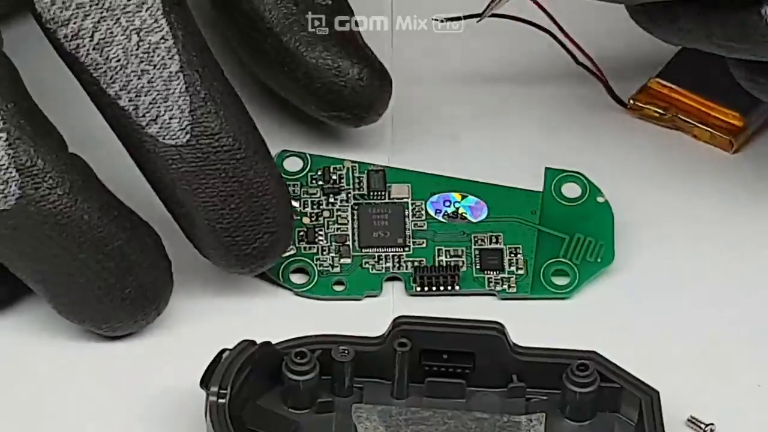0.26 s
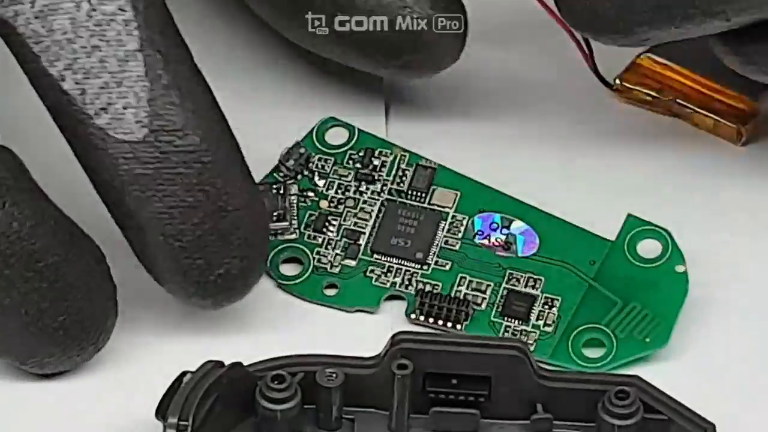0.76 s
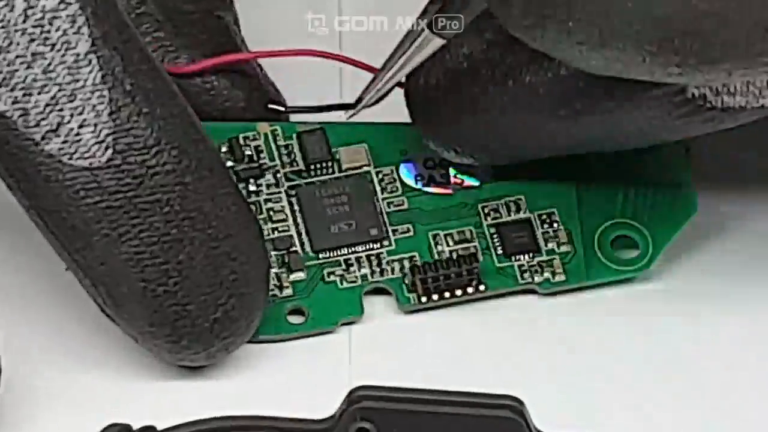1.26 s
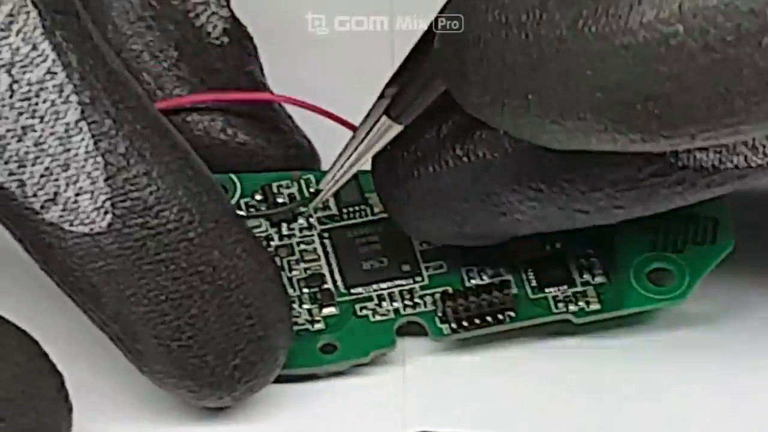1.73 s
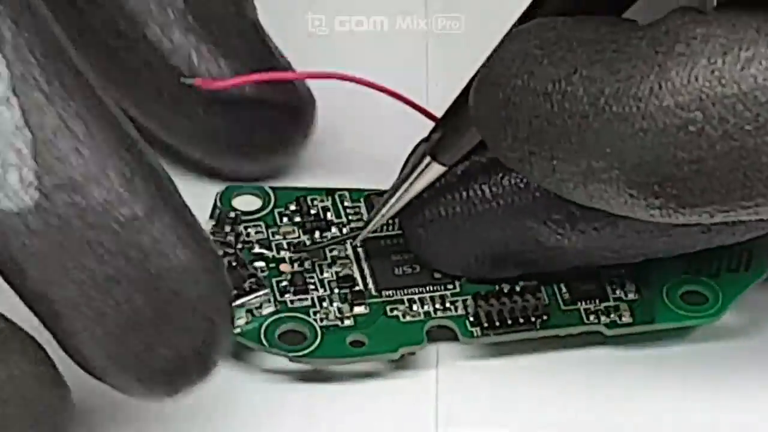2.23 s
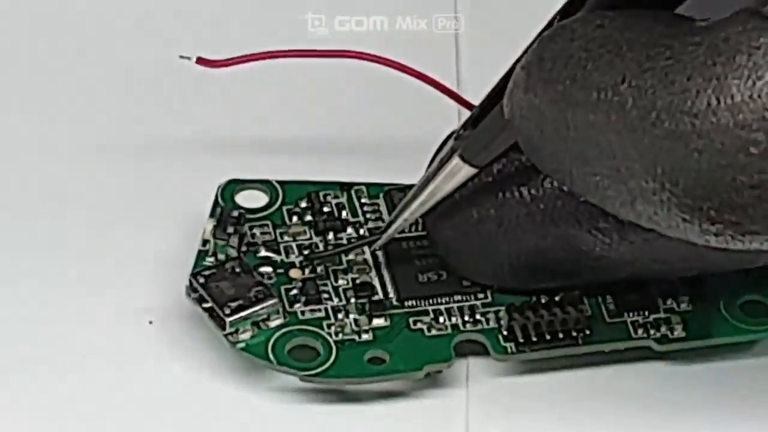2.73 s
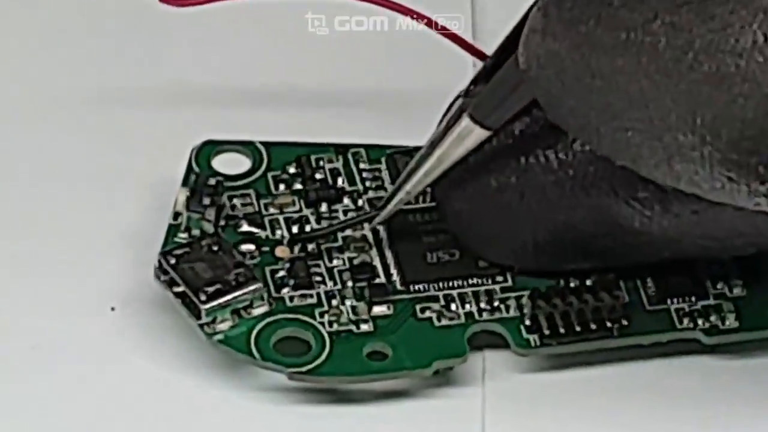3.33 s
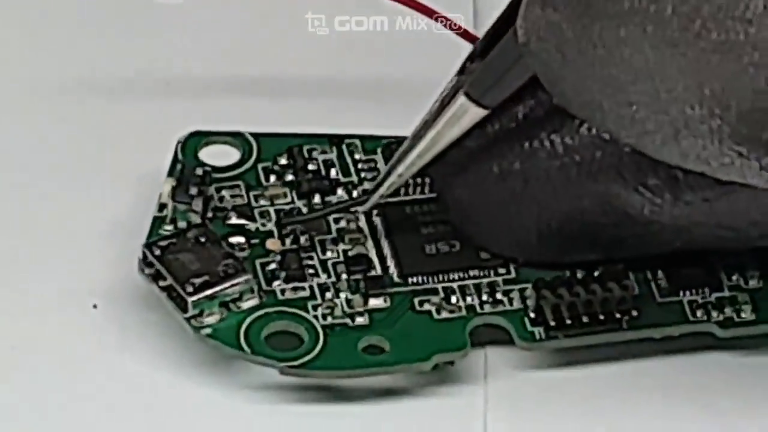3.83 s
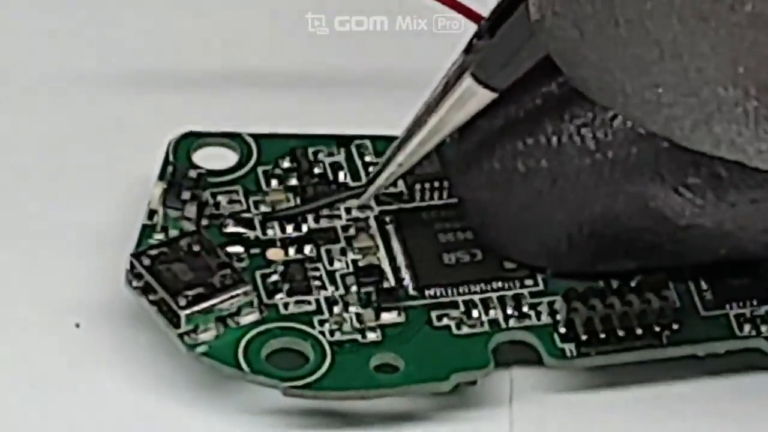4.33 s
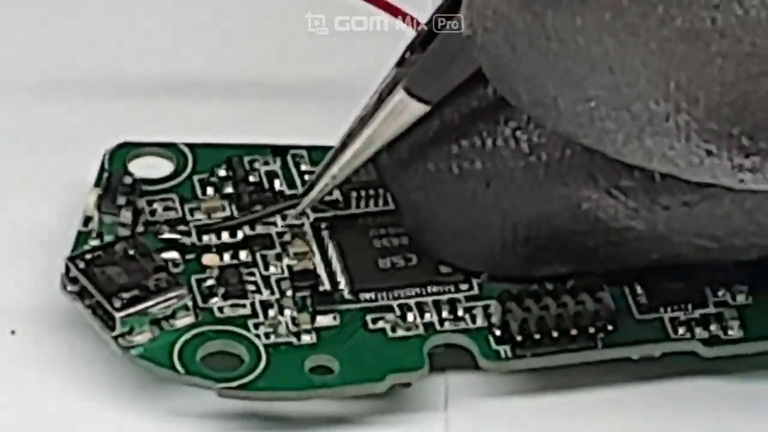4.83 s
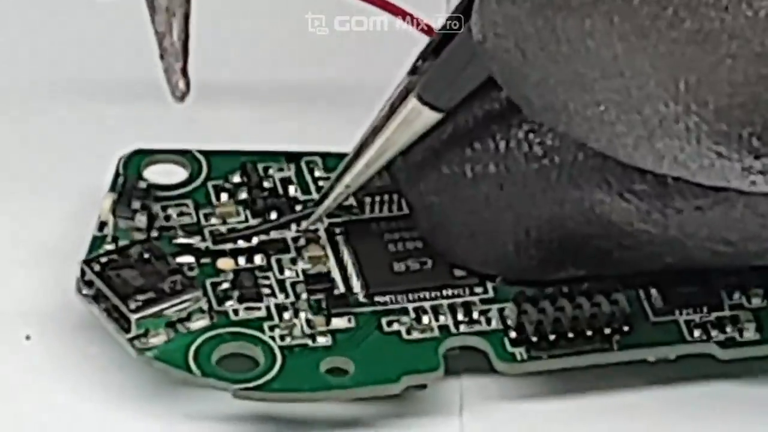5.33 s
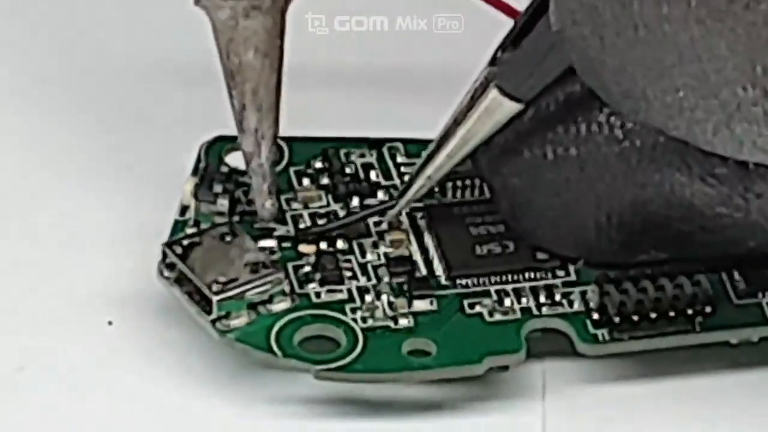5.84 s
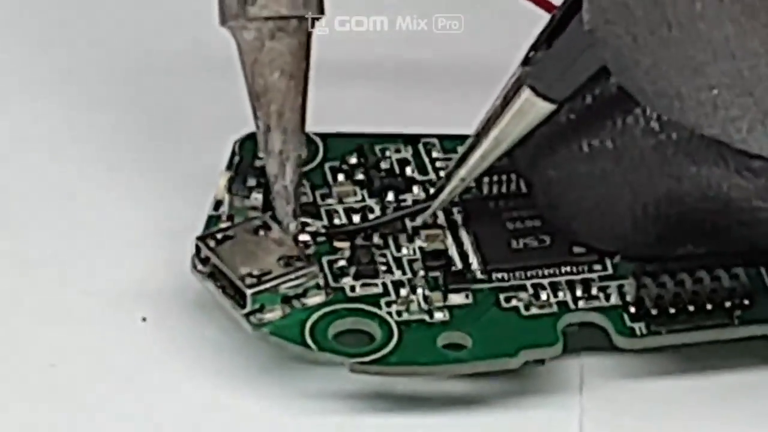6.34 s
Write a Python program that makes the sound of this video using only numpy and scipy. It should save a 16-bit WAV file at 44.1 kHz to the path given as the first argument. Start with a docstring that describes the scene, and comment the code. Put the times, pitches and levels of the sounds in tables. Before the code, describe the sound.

Faint rubs and tiny ticks on a small circuit board over a low hum, then one sharp metallic clack, a ring and a springy scrape.

```python
"""A fan's wavering hum under microphone hiss and swelling bench rumble, then ticks and rubs on a small board.
Gloved fingers and tweezers work at a quiet workbench, close to a stereo camera: filtered friction noise and
short modal blows. A scuff, then a sharp clack, a ring and a scrape as a metal tool is lifted from its stand:
cracks of noise with decaying modes, and a rasp with a singing spring. The near sounds come from the left;
the camera body shades their treble on the right, and a short room tail follows them."""
import sys
import numpy as np
from scipy import signal
from scipy.fft import rfft, irfft
from scipy.io import wavfile
from scipy.ndimage import uniform_filter1d

SR = 44100
rng = np.random.default_rng(int(sys.argv[2]) if len(sys.argv) > 2 else 0)


def unload_audio(sound):
    """Save the sound as a 16-bit wav file, at the path given as the first command line argument."""
    columns = np.transpose(np.atleast_2d(sound))
    # keep every value between -1 and 1, then stretch to whole-number steps
    steps = np.round(np.clip(columns, -1, 1) * 32767)
    wavfile.write(sys.argv[1], SR, steps.astype(np.int16))


N = 290619  # length in samples
LAG_S = .00023  # sounds reach the left microphone port this much before the right (s)


def gain_of(db):
    """Decibels to gain."""
    return 10 ** (np.asarray(db) / 20)


def evened(x):
    """Scaled to rms 1."""
    return x / np.sqrt(np.mean(x ** 2) + 1e-20)


def read(points, hz):
    """A spectrum read on a log-frequency axis."""
    f, value = np.transpose(points)
    return np.interp(np.log(hz + 1), np.log(f + 1), value)


def along(rows):
    """Each column of a curve over time, read at every sample."""
    s, *columns = np.transpose(rows)
    return np.array([np.interp(np.arange(N) / SR, s, column) for column in columns])


def colour(x, tone):
    """Filters by a spectrum in dB, without shifting phase."""
    hz = np.fft.rfftfreq(x.shape[-1], 1 / SR)
    return irfft(rfft(x) * gain_of(read(tone, hz)), x.shape[-1])


def resonate(x, hz, width):
    """A moving resonance: shifts the curve hz down to zero, smooths, and shifts back."""
    turn = np.exp(2j * np.pi * np.cumsum(hz) / SR)
    r = np.exp(-np.pi * width / SR)
    return 2 * (turn * signal.lfilter([1 - r], [1, -r], x / turn)).real


def grit(grain_db, count):
    """Friction noise whose strength flutters, smoothed over count samples, by grain_db rms."""
    flutter = evened(uniform_filter1d(rng.standard_normal(N), count))
    return rng.standard_normal(N) * gain_of(grain_db * flutter)


def swell(s, rise_s, db):
    """A bell-shaped pressure, about 17 dB down one rise before and one fall after its top."""
    t = np.arange(N) / SR - s
    fall_s = 0.017 + 0.19 * rise_s
    return gain_of(db) * np.exp(-2 * (t / np.where(t < 0, rise_s, fall_s)) ** 2)


def blows(rows, modes, rise_s, crack_s, low_hz, top_hz):
    """Each blow is a short crack of noise plus the object's modes, tilted by how hard the contact is."""
    out = np.zeros(N + SR)
    t = np.arange(SR * 3 // 4) / SR
    for s, db, crack_db, tilt_db in rows:
        ring = sum(gain_of(mode_db - 60 * t / t60) * np.sin(2 * np.pi * (hz * t + rng.random()))
                   for hz, mode_db, t60 in modes)
        # at 0 dB the crack starts with an rms of half the ring's peak
        crack = rng.standard_normal(len(t)) * np.exp(-t / crack_s) * gain_of(crack_db) / 2
        blow = (ring / abs(ring).max() + crack) * (1 - np.exp(-t / rise_s))
        tone = [(low_hz / 2, -30), (low_hz, 0), (top_hz, tilt_db), (1.3 * top_hz, tilt_db - 25)]
        blow = colour(blow, tone)
        # the filter wraps a pre-echo round to the last 200 samples, which are left out
        out[round(s * SR):][:len(t) - 200] += gain_of(db) * blow[:-200] / abs(blow).max()
    return out[:N]


# Spectrum of room air and microphone hiss. Each row: frequency in Hz, relative level in dB per Hz.
AIR_TONE = [(75, -38.5), (100, -16), (130, -7), (200, -10), (244, -4.5), (275, -18.5), (310, -8),
            (368, -18), (531, -16), (850, -21.5), (1100, -29), (1710, -36), (2810, -40), (6000, -49),
            (8490, -63.5), (11200, -43.5), (15900, -47)]
# Left-right likeness of the background. Each row: frequency in Hz, likeness (1 = the same noise in both ports).
LIKENESS = [(60, .8), (180, .94), (550, .7), (1500, 0)]
# Lean of the background to one side. Each row: frequency in Hz, left minus right in dB.
AIR_LEAN = [(60, 4.5), (240, 2.5), (950, 3.5), (15000, 2)]
# Swelling of the bench rumble. Each row: time in seconds, level in dB.
RUMBLE_LEVEL = [(0.0, -64), (0.71, -57), (6.13, -64), (6.59, -57.5)]
# Spectrum of the bench rumble. Each row: frequency in Hz, relative level in dB per Hz.
RUMBLE_SPECTRUM = [(12, -37.5), (40, 1), (75, -2), (105, -22), (150, -58)]


def air():
    """Partly shared noise in both ports, with the fan's wavering hum and the swelling rumble."""
    hiss_db, hum_db, hum_hz, waver = -58, -62, 237.5, 0.00842  # waver: rms share of pitch
    hz = np.fft.rfftfreq(N, 1 / SR)
    left, other = rfft(rng.standard_normal((2, N)))
    same = np.clip(read(LIKENESS, hz), -1, 1)
    right = same * left + np.sqrt(1 - same ** 2) * other
    right = right * np.exp(-2j * np.pi * hz * LAG_S)
    noise = np.array([left, right]) * gain_of(np.outer([.5, -.5], read(AIR_LEAN, hz)))
    hiss = gain_of(hiss_db) * evened(irfft(noise * gain_of(read(AIR_TONE, hz)), N))
    rumble = evened(irfft(noise * gain_of(read(RUMBLE_SPECTRUM, hz)), N))
    rumble = gain_of(along(RUMBLE_LEVEL)) * rumble
    drift = uniform_filter1d(rng.standard_normal(N), size=4000)
    drift = evened(uniform_filter1d(drift, size=4000))
    hum = np.sqrt(2) * np.sin(2 * np.pi * np.cumsum(hum_hz * (1 + waver * drift)) / SR)
    return hiss + rumble + hum * gain_of(hum_db + np.array([[1.], [-1.]]))  # 2 dB louder on the left


# The bench pushed. Each row: start in seconds, level in dB before rise and decay, frequency in Hz, t60 in s.
BENCH_PUSHES = [(2.259, -51, 53.7, 0.56), (3.215, -38, 207.3, 0.13), (3.274, -32.5, 209.8, 0.091),
                (3.28, -40.5, 73.86, .2), (3.278, -39, 126.2, 0.21), (4.291, -44, 61.3, 0.36)]


def thumps():
    """Low damped swings of the bench top, alike in both ports."""
    out, t = np.zeros(N + SR), np.arange(SR) / SR
    for s, db, hz, t60 in BENCH_PUSHES:
        swing = gain_of(db - 60 * t / t60) * np.sin(2 * np.pi * hz * t)
        out[round(s * SR):][:SR] += swing * (1 - np.exp(-t / 0.002))
    return out[:N]


# Near-sound decay of the room. Each row: frequency in Hz, t60 in seconds.
ROOM_DECAY = [(200, 0.48), (1400, 0.36), (3700, 0.29), (9700, 0.29), (14500, 0.18)]


def room(x):
    """Sparse taps of random sign, each band dying at its own speed, different for each port."""
    taps = np.zeros((2, SR))
    at = np.arange(200, SR - 20, 20) + rng.integers(0, 20, (2, (SR - 201) // 20))
    np.put_along_axis(taps, at, rng.choice([-1., 1.], at.shape), 1)
    hz, t, z = signal.stft(taps, SR, nperseg=256)
    decay = gain_of(-60 * t / read(ROOM_DECAY, hz)[:, None])
    tail = signal.istft(z * decay, SR, nperseg=256)[1]
    return signal.fftconvolve(x, tail / np.linalg.norm(tail[0]), axes=1)[:, :N]


# Colour of both microphone ports. Each row: frequency in Hz, gain in dB.
PORT_COLOUR = [(2000, 3), (6000, 0.5), (8300, -11.5), (11500, 0), (15500, -4.5)]
# Shading of near sounds by the camera body. Each row: frequency in Hz, left minus right in dB at full share.
BODY_SHADE = [(300, 1), (800, 1), (3100, -1.5), (5800, 9), (7200, 27), (9500, 23), (15000, 13)]


def ports(x, share=1.):
    """The camera body colours near sounds, shades their treble at the right port and delays it."""
    hz = np.fft.rfftfreq(N, 1 / SR)
    side = np.array([[.5], [-.5]])
    gain = gain_of(read(PORT_COLOUR, hz) + share * side * read(BODY_SHADE, hz))
    return irfft(rfft(x) * gain * np.exp(2j * np.pi * hz * side * LAG_S), N)


# Near-sound levels in all tables below hold before the room and the ports. Dull knocks on the bench: the first,
# at 0.46 s, is the low thud of the fingers rubbing the board; the rest come from the stand. Each row: start in
# seconds, peak in dB, crack in dB against the ring, tilt in dB.
STAND_KNOCKS = [(0.4594, -48, 11, -1), (3.197, -50, -7.5, -11.5), (4.198, -37.5, 11.5, -13),
                (4.548, -50, 10, -43), (4.711, -49.5, -4, 6)]
# Modes of the bench. Each row: frequency in Hz, relative level in dB before the tilt, t60 in seconds.
BENCH_MODES = [(540, -3, .04), (860, -1, .04), (1360, 0, .04), (1750, -3, .03)]


def knocks():
    """Dull knocks of the stand and of the rubbed board on the bench, whose modes die within hundredths of a
    second."""
    return blows(STAND_KNOCKS, BENCH_MODES, rise_s=0.00042, crack_s=0.0026, low_hz=430, top_hz=6700)


# Finger strokes. Each row: strongest moment in s, rise in s, level in dB, fizz in dB above the board sound.
STROKES = [(0.415, 0.046, -67, -28), (0.448, 0.19, -68, 4), (0.463, 0.0081, -65.5, -3),
           (0.665, 0.093, -82.5, 12), (0.925, 0.041, -73, 11.5), (1.028, 0.1, -75.5, 12.5),
           (1.348, 0.023, -65.5, 2.5), (1.537, 0.016, -63, 3.5), (1.728, 0.017, -65, 1),
           (1.852, 0.29, -73, 4), (2.221, 0.043, -75.5, 10.5), (2.28, 0.14, -69, 4.5),
           (2.64, 0.053, -82, -10), (3.228, 0.03, -80.5, 21.5), (3.823, 0.093, -75.5, -1.5),
           (4.721, 0.015, -75.5, 16.5), (4.77, 0.036, -73, 6), (4.956, 0.041, -80.5, 11.5),
           (5.44, 0.048, -74.5, -2)]
# Spectrum of the board's rustle. Each row: frequency in Hz, relative level in dB per Hz.
BOARD_RUSTLE = [(1000, -13.5), (2400, -4.5), (3300, -1), (5000, -7), (7000, -4.5), (10000, -51)]
# Spectrum of the glove's fizz. Each row: frequency in Hz, relative level in dB per Hz.
GLOVE_FIZZ = [(5500, -36.5), (7500, -8.5), (9000, -11.5), (12500, -8), (14800, -14), (15800, -13.5)]
# Faint rustle while the fingers hold and shift the board. Each row: time in seconds, level in dB.
HOLDING = [(.8, -115), (.95, -88), (1.2, -79.5), (1.63, -85.5), (2.02, -95.5), (2.7, -84.5), (2.85, -115)]


def rubbing():
    """The board's dull rustle and the glove's bright fizz follow one pressure."""
    board = evened(colour(grit(2.3, count=120), BOARD_RUSTLE))
    fizz = evened(colour(grit(2.2, count=60), GLOVE_FIZZ))
    held = gain_of(along(HOLDING)[0]) * (board + gain_of(5.5) * fizz)
    strokes = sum(swell(s, rise_s, db) * (board + gain_of(fizz_db) * fizz)
                  for s, rise_s, db, fizz_db in STROKES)
    return held + strokes


# Ticks on the board. Each row: start in seconds, peak in dB, crack in dB against the ring, tilt in dB.
BOARD_TICKS = [(0.2294, -46, 3, -28), (0.2608, -34, 5, -13), (0.6365, -42.5, 39, 11),
               (1.0889, -51.5, 18, 33), (1.531, -51, 2, -12), (2.2054, -33.5, 2.5, -1.5),
               (6.1794, -53, 32, 17)]
# Modes of the board. Each row: frequency in Hz, relative level in dB before the tilt, t60 in seconds.
BOARD_MODES = [(3250, -3, .022), (3520, 0, .024), (4670, -2, .02), (6100, -3, .015)]


def ticks():
    """Small taps excite the board's short modes behind a brief crack."""
    return blows(BOARD_TICKS, BOARD_MODES, rise_s=.0003, crack_s=.003, low_hz=2550, top_hz=11000)


# Resonances of the scuff. Each row: frequency in Hz, relative gain in dB.
SCUFF_MODES = [(974, -3), (1570, 0), (3220, -4), (4300, -1), (5200, -10), (6190, -10), (6950, -12)]


def scuff():
    """A light scuff on the stand: grit through broad resonances, starting quickly and fading."""
    start_s, level_db, rise_s, t60_s, width_hz = 3.044, -54, 0.0016, 0.1, 320
    drive = grit(2.3, count=150)
    t = np.maximum(np.arange(N) / SR - start_s, 0)
    body = sum(gain_of(db) * resonate(drive, np.full(N, hz), width_hz) for hz, db in SCUFF_MODES)
    body = colour(body, [(7000, 0), (8500, -30)])
    return evened(body) * (1 - np.exp(-t / rise_s)) * gain_of(level_db - 60 * t / t60_s)


# Metal sliding on metal. Each row: time in seconds, rasp in dB, singing in dB above the rasp.
SLIDING = [(3.98, -120, -5), (4.02, -87, -6), (4.06, -62.5, 0.5), (4.105, -62.5, 3.5), (4.15, -74, 0),
           (4.19, -58.5, 1.5), (4.25, -77.5, 9), (4.3, -77.5, 7.5), (4.41, -74, -8), (4.485, -77.5, -5),
           (4.508, -72, 11), (4.6, -71, 1.5), (4.66, -78, -16), (4.72, -82, -2), (4.8, -120, -5)]
# Spectrum of the rasp. Each row: frequency in Hz, relative level in dB per Hz.
RASP_TONE = [(1500, 6), (3300, -5), (5000, 5.5), (8500, 1.5), (12000, 6), (15700, -3.5)]
# Modes of the stand's spring. Each row: frequency in Hz, width in Hz, relative level in dB in each of three slides.
SPRING_MODES = [(3480, 110, -6, -14, -14), (3760, 90, -9, -1, -12), (5155, 110, -9, -14, -7),
                (9490, 110, -14, -8, -2), (10170, 150, 0, -12, -4), (11770, 200, -1, -5, -1),
                (5950, 110, -14, -14, -4), (14270, 100, -14, -9, 0)]
# Moments in seconds at which the spring has the levels of each slide.
SLIDE_PEAKS_S = [4.12, 4.22, 4.5]


def scrape():
    """Rasping contact makes a spring sing; each slide favours other modes, which break up and drift."""
    break_db, drift = 4.5, .008  # rms flutter of each mode's level, and of its pitch as a share
    stretch = slice(round(SLIDING[0][0] * SR), round(SLIDING[-1][0] * SR))
    drive = grit(2.6, count=150)
    t = np.arange(N)[stretch] / SR
    breaks, drifts = uniform_filter1d(rng.standard_normal((2, len(SPRING_MODES), len(t))), size=450)
    voices = np.zeros(len(t))
    for breaking, drifting, (hz, width, *slide_dbs) in zip(breaks, drifts, SPRING_MODES):
        level_db = np.interp(t, SLIDE_PEAKS_S, slide_dbs) + break_db * evened(breaking)
        pitch = hz * (1 + drift * evened(drifting))
        voices += gain_of(level_db) * evened(resonate(drive[stretch], pitch, width))
    sing = np.zeros(N)
    sing[stretch] = evened(voices)
    rasp = evened(colour(drive, RASP_TONE))
    rasp_db, sing_db = along(SLIDING)
    return gain_of(rasp_db) * (rasp + gain_of(sing_db) * sing)


# The stand is struck. Each row: start in seconds, peak in dB, crack in dB against the ring, tilt in dB.
STAND_BLOWS = [(3.441, -34, -7, -4)]
# Modes of the stand. Each row: frequency in Hz, relative level in dB before the tilt, t60 in seconds.
STAND_MODES = [(985, -8, .4), (1022.5, -3, .55), (1518, -13, .28), (1658, -13, .3), (1728, -11, .3),
               (1900, -7, .2), (2509, -6, .28), (2885, -6, .3), (3500, -8, .05), (4500, -8, .24),
               (4915, -10, .2), (5173, -5, .16)]


def stand_ring():
    """The struck stand rings on in its own modes under a longer noisy onset."""
    return blows(STAND_BLOWS, STAND_MODES, rise_s=0.00045, crack_s=0.053, low_hz=920, top_hz=5140)


# The tool catches, snaps free and bounces. Each row: start in seconds, peak in dB,
# crack in dB against the ring, tilt in dB.
TOOL_BLOWS = [(3.194, -37, 25, 23), (3.2622, -14, 6, 9.5), (3.2665, -17.5, 6, 5.5), (3.275, -21.5, 4, -8)]
# Modes of the tool. Each row: frequency in Hz, relative level in dB before the tilt, t60 in seconds.
TOOL_MODES = [(340, -6, .07), (580, -1, .09), (883, -8, .1), (1319, -3, .06), (1836, -6, .2),
              (2977, -9, .1), (3562, 1, .055), (3962, -8, .1), (4410, 0, .055), (4701, -5, .1),
              (5457, 1, .055), (5938, -5, .08), (9566, -3, .05), (11850, -1, .07), (11978, -3, .045),
              (14800, 2, .08)]


def clacks():
    """The metal tool's quickly dying modes behind each crack; close blows merge into one clack."""
    return blows(TOOL_BLOWS, TOOL_MODES, rise_s=.0003, crack_s=0.005, low_hz=220, top_hz=13000)


def scene():
    """Near sounds and their room pass the ports, over air and bench."""
    rubs = rubbing() + scrape() + scuff()
    tick, clack, knock, ring = ticks(), clacks(), knocks(), stand_ring()
    near = rubs + tick + clack + knock + ring
    # how strongly each near sound reaches the room
    wet = gain_of(-1.5) * rubs + gain_of(-6.5) * tick + gain_of(-4.5) * clack
    wet = wet + gain_of(-7.5) * knock + gain_of(-16.) * ring
    return air() + thumps() + ports(near) + ports(room(wet[None]), share=0.69)


def record(dry):
    """The band limit: a steep low-pass at 15950 Hz."""
    low_pass = signal.firwin(511, 15950, window=("kaiser", 9), fs=SR)
    return signal.oaconvolve(dry, low_pass[None], "same")


dry = scene()
out = record(dry)
unload_audio(out)
```